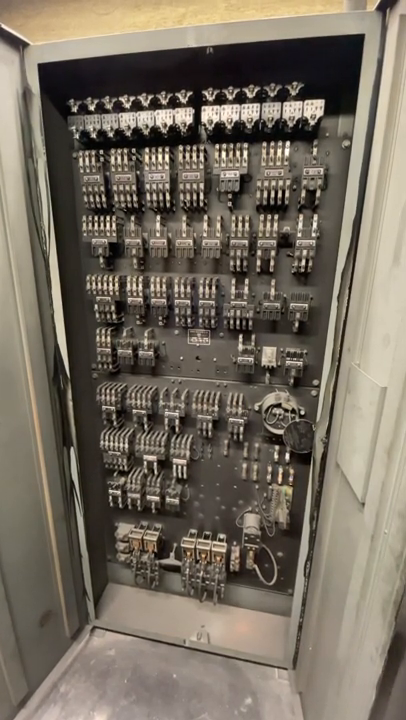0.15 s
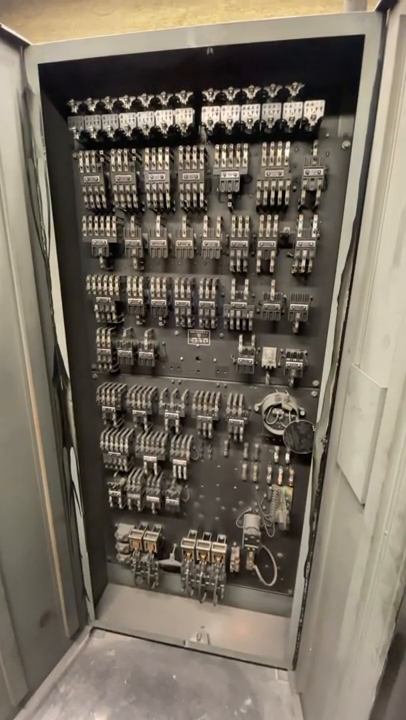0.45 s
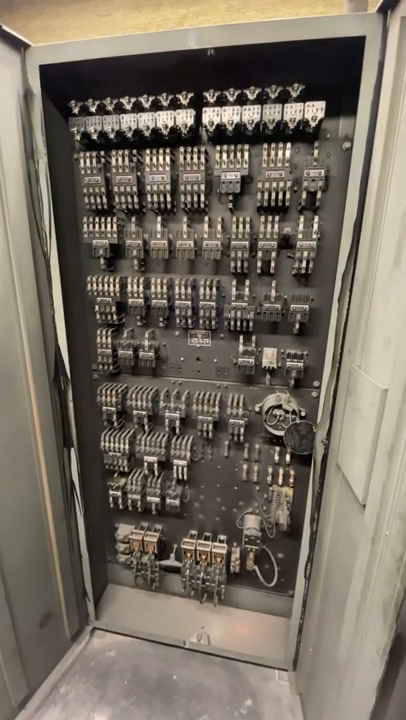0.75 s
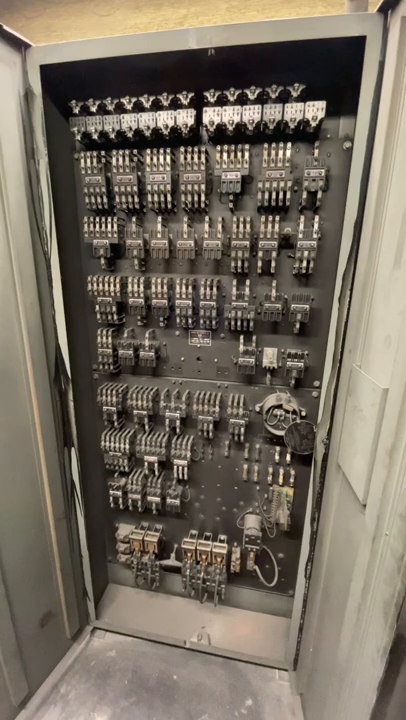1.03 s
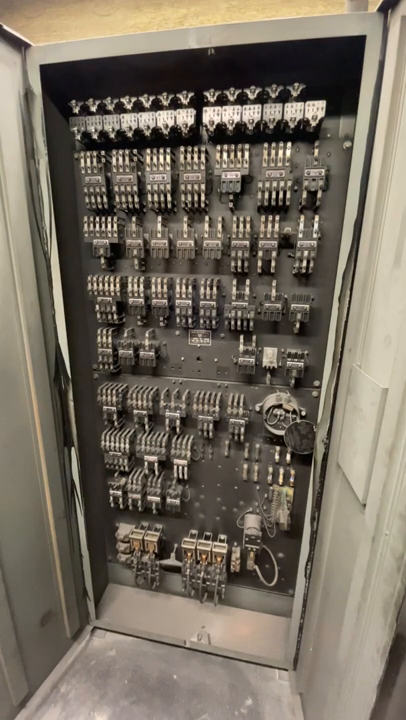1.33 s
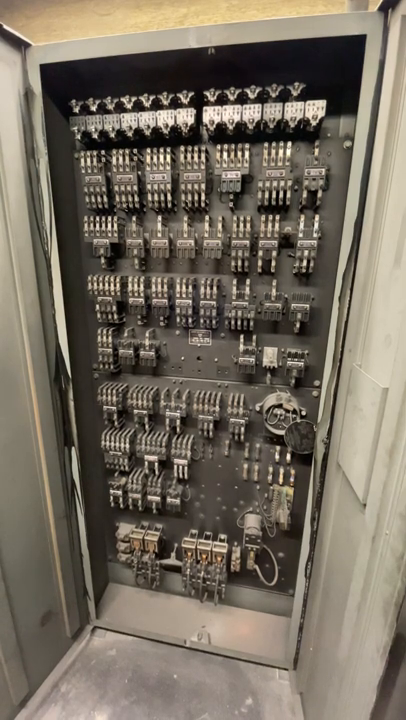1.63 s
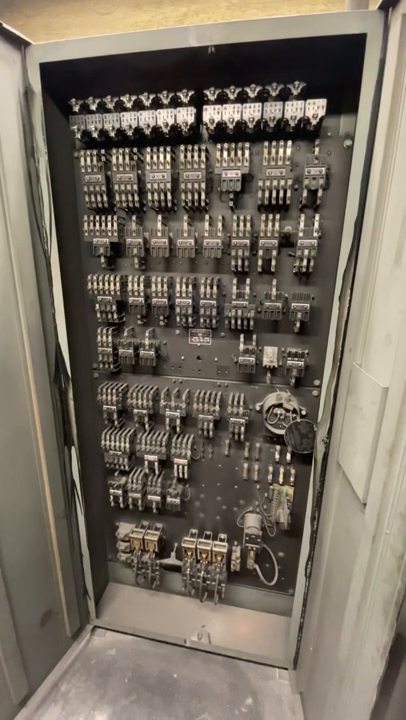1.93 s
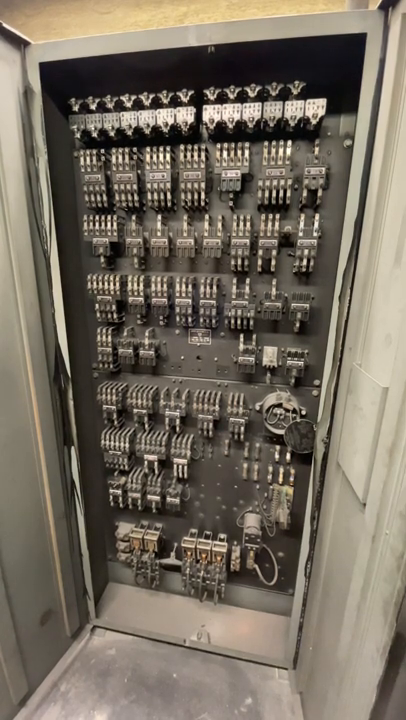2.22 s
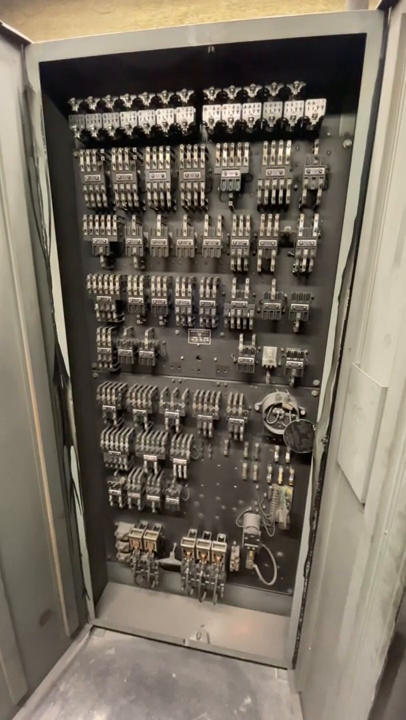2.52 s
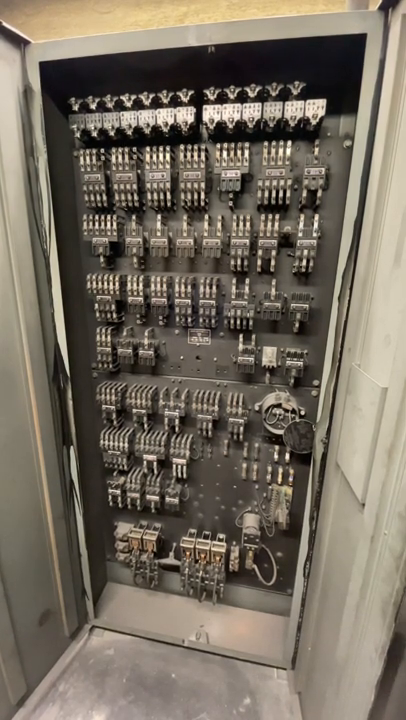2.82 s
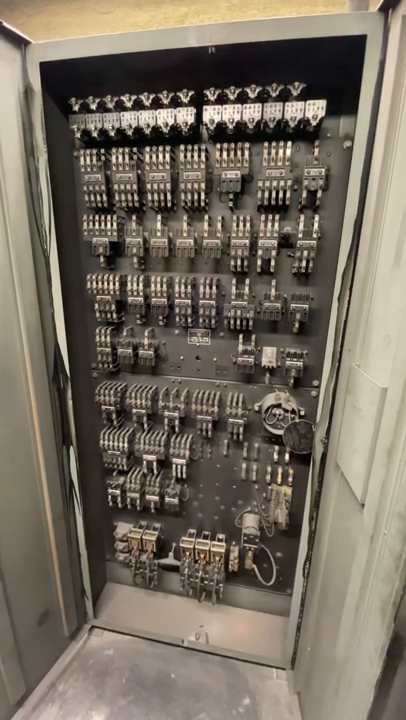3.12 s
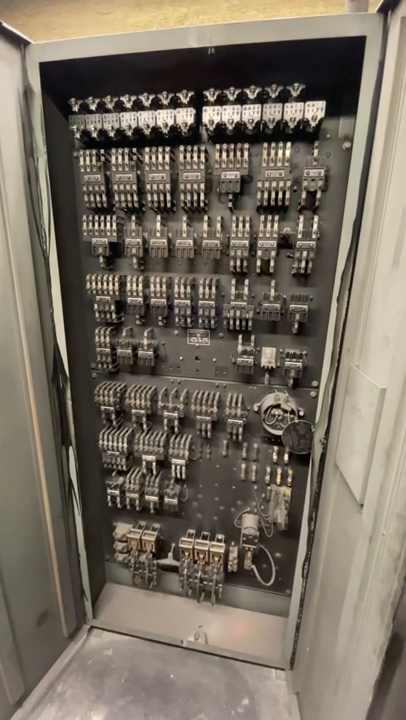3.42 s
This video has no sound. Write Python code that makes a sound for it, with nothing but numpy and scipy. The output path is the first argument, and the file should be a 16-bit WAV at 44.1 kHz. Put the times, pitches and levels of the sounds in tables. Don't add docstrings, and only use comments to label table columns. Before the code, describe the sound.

Hum and airy ventilation noise run throughout a machine room. Relays snap once, later rattle through a longer run, then clatter hard again, captured close in stereo; the background dips briefly after the loudest burst.

```python
import sys
import numpy as np
from scipy import signal
from scipy.fft import rfft, irfft
from scipy.io import wavfile
from scipy.ndimage import uniform_filter1d

SR = 44100
rng = np.random.default_rng(int(sys.argv[2]) if len(sys.argv) > 2 else 0)


def output_pcm(signal):
    pcm = np.clip(np.atleast_2d(signal).T, -1, 1) * 32767
    wavfile.write(sys.argv[1], SR, np.round(pcm).astype(np.int16))


def field_ratio(decibels):
    return 10 ** (np.asarray(decibels, dtype=float) / 20)


N = 156996
HZ = np.fft.rfftfreq(N, 1 / SR) + 1e-3

# [freq_hz, level_db_per_hz]
ROAR = [(30, -11), (55, -4), (150, 0), (700, -1), (2000, -9), (3900, -15), (7300, -24.5), (12800, -38.5)]
# [freq_hz, width_hz, gain_db over the
ROAR_PEAKS = [(312, 34, 6), (1293, 360, -4.5), (1940, 93, 7), (3840, 930, -8), (5020, 1430, 11.5),
              (9500, 1340, 5.5)]
ROAR_DB, GUST_DB, ROAR_TOP_HZ = -29.5, 0.63, 14000

# [freq_hz, width_hz, level_db rms]
HUM = [(99, 2.7, -48), (147.7, 29, -41), (194.16, 21, -35.5), (224.6, 18, -41.5), (308, 30, -47.5),
       (326.7, 5.3, -39.5), (353.8, 8, -36.5), (1081, 7.3, -50), (1438, 6.4, -47), (1905, 25, -46),
       (3300, 5.5, -58), (6500, 5, -57.5)]
# [time_s, hum_gain_db]
MOTOR_LOAD = [(0, -2.5), (.5, -1.5), (1.0, -0.5), (1.9, 1.5), (2.2, -1), (2.6, 2.5), (3.1, -1.5),
              (3.56, 1.5)]

# [start_s, frame_db, spring_db, chatter_s, frame_tilt_db_per_octave]
SWITCHINGS = [(.851, -46, -41, 0.012, 1), (.876, -44.5, -30, 0.011, 6), (.8945, -21, -17, 0.0038, -2.5),
              (.901, -23, -42, 0.015, -1), (2.046, -26.5, -30, 0.003, -2.7),
              (2.0562, -22, -22.5, 0.001, -0.5), (2.0615, -24, -24, 0.0036, -2.5),
              (2.069, -23.5, -24, 0.017, -2.5), (2.0936, -24.5, -17, 0.0022, 0),
              (2.0965, -22, -43, 0.0029, -0.2), (2.217, -30.5, -25, 0.0081, -3),
              (2.2255, -46, -23, 0.0025, 6), (2.24, -28, -46, 0.0043, -5.5), (2.31, -38, -48, 0.014, 0),
              (2.3276, -65, -23.5, .003, 9), (2.3316, -27.5, -34, 0.007, -1),
              (2.822, -31, -21.5, 0.0036, 1), (2.828, -26, -17, 0.017, 2.5),
              (2.842, -21, -12.5, 0.0075, 1.5), (2.858, -25.5, -16, 0.0096, 1),
              (2.869, -28, -21, 0.015, 3.5), (2.9068, -17, -18, 0.0032, -0.7)]
# [start_s, freq_hz, level_db, t60_s]
SEATINGS = [(.876, 8700, -29, .02), (0.8958, 1770, -7, 0.015), (.9, 1470, -13.5, 0.027),
            (2.0565, 2070, -5.5, 0.015), (2.058, 3690, -10, 0.013), (2.096, 2010, -9, .018),
            (2.099, 1120, -21, 0.022), (2.332, 994, -17, 0.12), (2.829, 11200, -31, .04),
            (2.8445, 11210, -11.5, 0.058), (2.847, 1850, -18, 0.041), (2.857, 957, -17, 0.035),
            (2.848, 5240, -16, .06), (2.909, 1075, -14.5, 0.034), (2.908, 4400, -13.5, 0.013),
            (2.915, 2850, -18, .04), (0.8977, 5400, -17, .025), (2.3314, 1880, -18.5, 0.023),
            (2.0575, 1660, -14, 0.015), (2.87, 1860, -16, 0.014)]
# [start_s, freq_hz, level_db, t60_s, chatter_s]
LEAVES = [
    (.8945, 15450, -19, .09, .004),
    (2.047, 15500, -27, .06, .005),
    (2.0936, 15500, -17, .09, .004),
    (2.2255, 15500, -38, .08, .004),
    (2.3276, 15550, -26, .11, .005),
    (2.828, 15600, -24, .08, .03),
    (2.9068, 15500, -19, .06, .003),
]
# [freq_hz, level_db]
FRAME = [(500, -13), (1000, -10), (2000, -8.5), (3500, -7), (5400, -8.5), (7000, -0.5)]
# [freq_hz, level_db]
SPRINGS = [(7000, -6.5), (9000, -11.5), (11300, -12.5), (12500, -15), (13200, -17.5), (14000, -12)]
BOUNCES_PER_S, BOUNCE_SPREAD_DB, MODE_SPREAD_DB = 4700, 3.5, 2.5
FRAME_T60_S, SPRING_T60_S, MODE_RISE_S = 0.041, 0.033, 0.0011
SEATING_RISE_PER_T60, SEATING_DETUNE, SEATING_WASH = 0.03, 0.011, 0.38
CABINET_DB, CABINET_T60_S, TREBLE_T60_S, CABINET_CUT_HZ = -2.5, 0.34, 0.054, 2000
KNOCK_FLOOR_HZ = 440

# [freq_hz, likeness_0_to_1]
LIKENESS = [(60, .997), (150, .996), (290, .95), (640, .55), (1400, .75), (3100, .4), (6000, .55),
            (7400, .9), (15000, .93)]
# [freq_hz, lead_rad]
LEFT_LEAD = [(300, 0), (1400, -.2), (2600, -1.9), (5000, 1.1), (7500, 3.14), (11000, 6.28), (14200, 9.42),
             (16000, 11.3)]
# [freq_hz, left_minus_right_db]
LEFT_DB = [(60, 0), (120, .4), (200, 1.4), (380, 4.5), (700, 4.2), (1300, 2.4), (2400, 0), (7000, 0)]

DUCK_ABOVE_DB, DUCK_DB_PER_DB, DUCK_BACK_DB_PER_S = -19, 1.07, 52
DUCK_SENSE_S, DUCK_LAG_S, DUCK_TREBLE = 0.129, 0.1137, 0.76
CUTOFF_HZ = 17100


def rms_one(x):
    return x / np.sqrt(np.mean(x ** 2) + 1e-20)


def at_hz(points, hz):
    table_hz, values = np.transpose(points)
    return np.interp(np.log(hz), np.log(table_hz), values)


def bell(hz, width_hz):
    return 1 / (1 + (2 * (HZ - hz) / width_hz) ** 2)


def coloured(gain):
    return rms_one(irfft(rfft(rng.standard_normal((2, N))) * gain, N))


def ventilation():
    boost_db = sum(db * bell(hz, width_hz) for hz, width_hz, db in ROAR_PEAKS)
    gust = rms_one(irfft(rfft(rng.standard_normal(N)) * bell(0, 18.0), N))
    top_cut = 1 + (HZ / ROAR_TOP_HZ) ** 36
    low_cut = 1 + (25 / HZ) ** 3
    colour = field_ratio(at_hz(ROAR, HZ) + boost_db) / top_cut / low_cut
    return field_ratio(ROAR_DB + GUST_DB * gust) * coloured(colour)


def motor():
    power = sum(field_ratio(2 * db) * bell(hz, width_hz) ** 2 / width_hz for hz, width_hz, db in HUM)
    total_rms = np.sqrt(sum(field_ratio(2 * db) for _, _, db in HUM))
    load_db = np.interp(np.arange(N) / SR, *np.transpose(MOTOR_LOAD))
    return coloured(np.sqrt(power)) * field_ratio(load_db) * total_rms


def cabinet(x):
    t = np.arange(SR // 2) / SR
    white = rng.standard_normal((2, t.size)) * (t > .003)
    pole = np.exp(-2 * np.pi * CABINET_CUT_HZ / SR)
    dull = signal.lfilter([1 - pole], [1, -pole], white)
    bright = white - dull
    wash = dull * field_ratio(-60 * t / CABINET_T60_S) + bright * field_ratio(-60 * t / TREBLE_T60_S)
    wash /= np.sqrt(np.sum(wash ** 2, axis=1, keepdims=True))
    return field_ratio(CABINET_DB) * signal.fftconvolve(x[None], wash, axes=1)[:, :N]


def rings(hz, db, t60_s, rise_s):
    t = np.arange(6144) / SR
    hz, db, t60_s = (np.reshape(v, (-1, 1)) for v in (hz, db, t60_s))
    envelope = field_ratio(db - 60 * t / t60_s) * (1 - np.exp(-t / rise_s))
    return envelope * np.sin(2 * np.pi * hz * t)


def twins(hz, db, t60_s):
    pair_hz = [hz, hz * (1 + SEATING_DETUNE)]
    return rings(pair_hz, [db, db - 6], t60_s, SEATING_RISE_PER_T60 * t60_s).sum(axis=0)[None]


def steel_part(colour, t60_s, tilt_db, modes):
    luck = rng.random(size=(5, modes))
    low_hz, high_hz = colour[0][0], colour[-1][0]
    hz = low_hz + (high_hz - low_hz) * (np.arange(modes) + luck[0]) / modes
    db = at_hz(colour, hz) + tilt_db * np.log2(hz / colour[2][0])
    db += MODE_SPREAD_DB * 2 * (.5 - luck[1])
    signs = np.sign(luck[3:5] - .5)
    return signs @ rings(hz, db, t60_s * (.5 + luck[2]), MODE_RISE_S)


def chatter(length_s):
    luck = rng.random(size=(3, 3000))
    sizes = field_ratio(BOUNCE_SPREAD_DB * np.minimum(-np.log(luck[0]), 4)) * np.sign(luck[1] - .5)
    touches = luck[2] < BOUNCES_PER_S / SR
    run = sizes * touches * np.exp(-np.arange(3000) / SR / max(length_s, 1e-3))
    run[0] = 2
    return run / np.sqrt(np.sum(run ** 2))


def add(out, start_s, sound):
    i = int(start_s * SR)
    out[:, i:i + sound.shape[-1]] += sound[..., :N - i]


def relays():
    bounces, seats = np.zeros((2, 2, N))
    for start_s, frame_db, spring_db, chatter_s, tilt_db in SWITCHINGS:
        body = field_ratio(frame_db) * steel_part(FRAME, FRAME_T60_S, tilt_db, 100)
        body += field_ratio(spring_db) * steel_part(SPRINGS, SPRING_T60_S, 0, 70)
        add(bounces, start_s, signal.fftconvolve(body, chatter(chatter_s)[None], axes=1))
    for start_s, hz, db, t60_s in SEATINGS:
        add(seats, start_s, twins(hz, db, t60_s))
    knocks = bounces + seats + cabinet(bounces[0] + SEATING_WASH * seats[0])
    for start_s, hz, db, t60_s, chatter_s in LEAVES:
        add(knocks, start_s, signal.fftconvolve(twins(hz, db, t60_s), chatter(chatter_s)[None]))
    high_pass = signal.butter(2, KNOCK_FLOOR_HZ, "high", fs=SR, output="sos")
    return signal.sosfilt(high_pass, knocks)


def ports(pair):
    shared, own = rfft(pair)
    alike = np.clip(at_hz(LIKENESS, HZ), 0, 1)
    turn = field_ratio(at_hz(LEFT_DB, HZ) / 2) * np.exp(.5j * at_hz(LEFT_LEAD, HZ))
    shared = np.sqrt((1 + alike) / 2) * shared
    own = np.sqrt((1 - alike) / 2) * own
    return irfft(np.array([(shared + own) * turn, (shared - own) / turn]), N)


def scene():
    return ports(relays() + ventilation() + motor())


def band_limit(x):
    return signal.sosfilt(signal.butter(12, 16370, fs=SR, output="sos"), x)


def record(dry):
    sensed = signal.lfilter([1 + DUCK_TREBLE, -DUCK_TREBLE], [1], dry)
    power = uniform_filter1d(np.mean(sensed ** 2, axis=0), int(DUCK_SENSE_S * SR))
    level_db = 10 * np.log10(np.abs(power) + 1e-9)
    over_db = DUCK_DB_PER_DB * np.maximum(level_db - DUCK_ABOVE_DB, 0)
    slope_db = DUCK_BACK_DB_PER_S * np.arange(N) / SR
    held_db = np.maximum.accumulate(over_db + slope_db) - slope_db
    late_db = np.interp(np.arange(N) - DUCK_LAG_S * SR, np.arange(N), held_db)
    low_pass = signal.cheby2(12, 70, CUTOFF_HZ, fs=SR, output="sos")
    mix = signal.sosfilt(low_pass, dry * field_ratio(-late_db))
    return band_limit(mix)


dry = scene()
out = record(dry)
output_pcm(out)
```